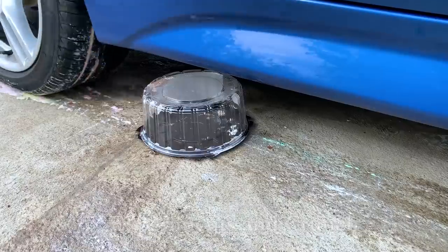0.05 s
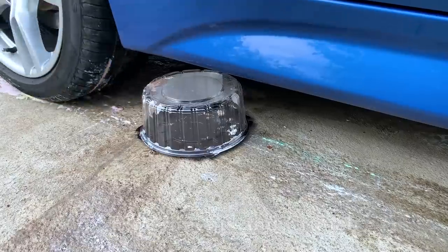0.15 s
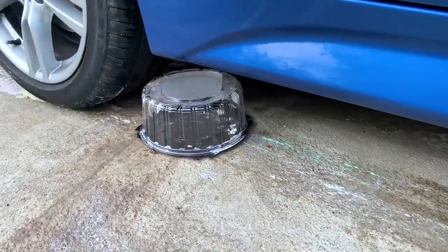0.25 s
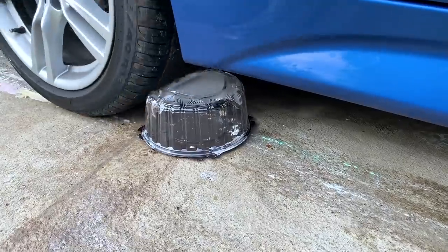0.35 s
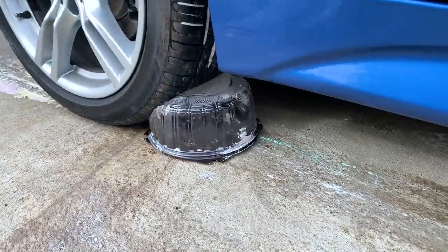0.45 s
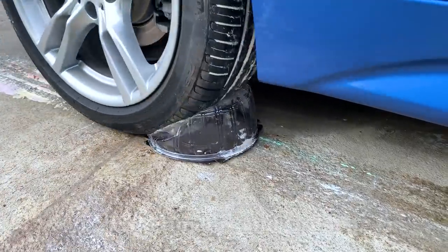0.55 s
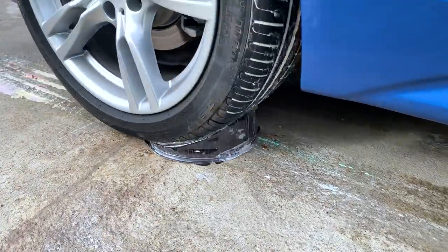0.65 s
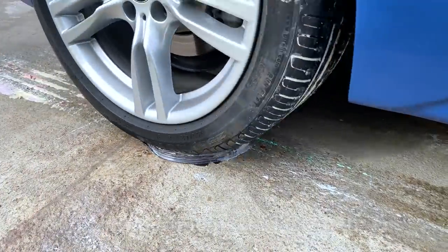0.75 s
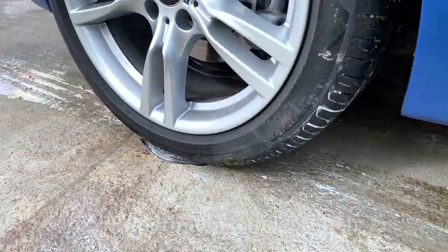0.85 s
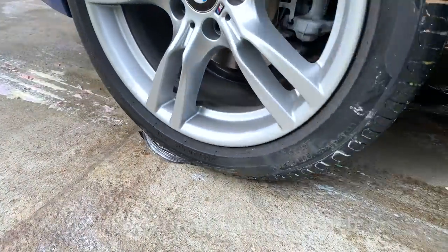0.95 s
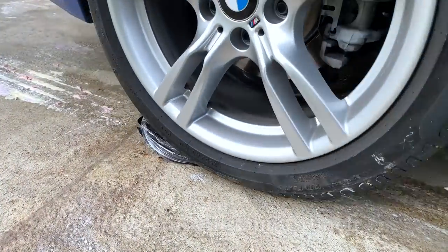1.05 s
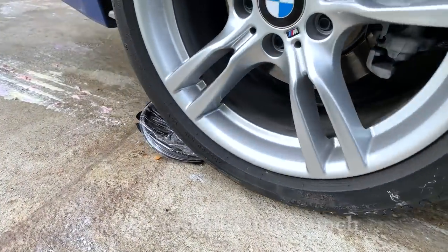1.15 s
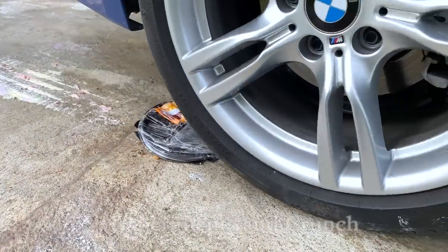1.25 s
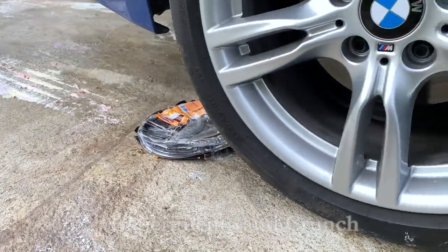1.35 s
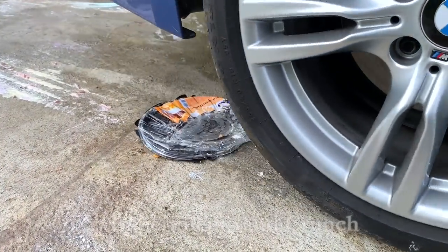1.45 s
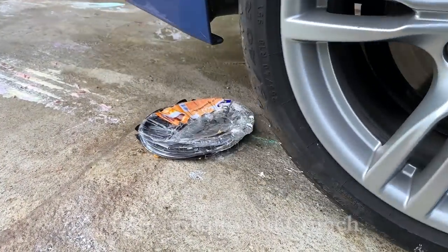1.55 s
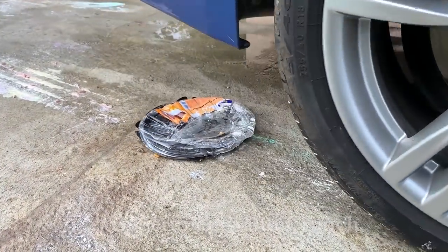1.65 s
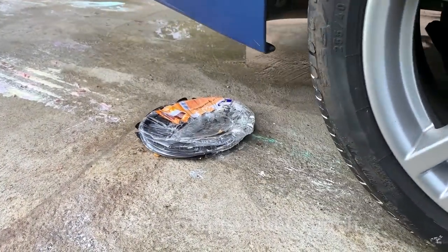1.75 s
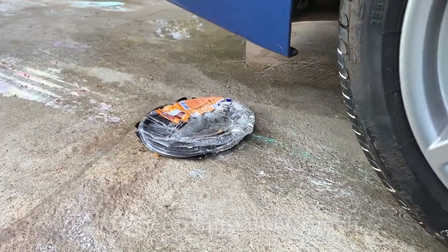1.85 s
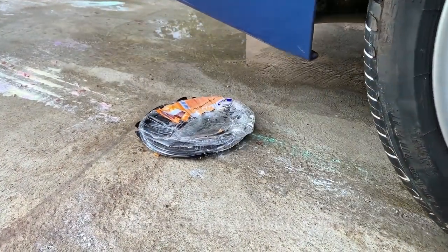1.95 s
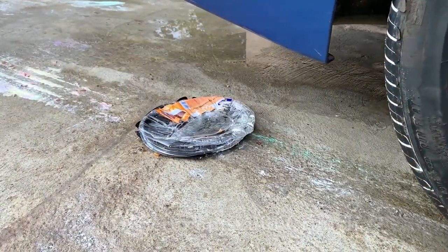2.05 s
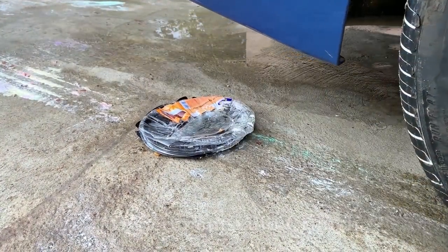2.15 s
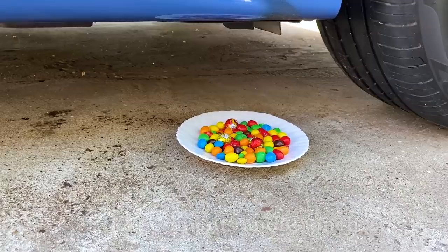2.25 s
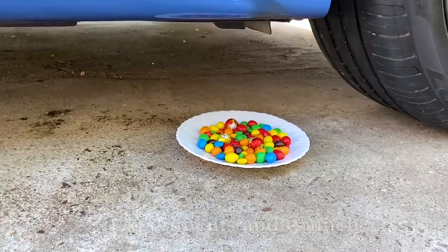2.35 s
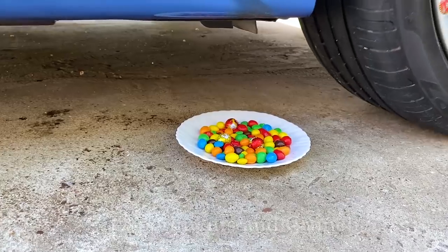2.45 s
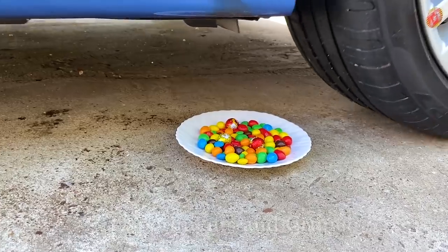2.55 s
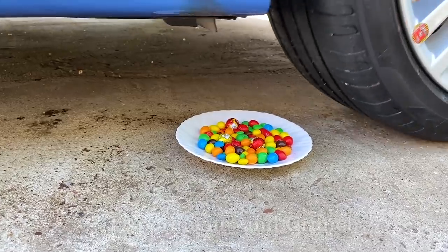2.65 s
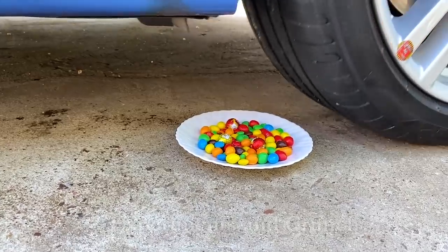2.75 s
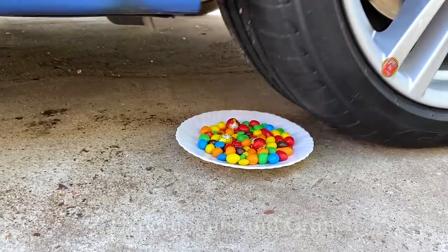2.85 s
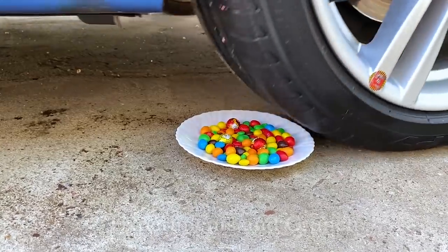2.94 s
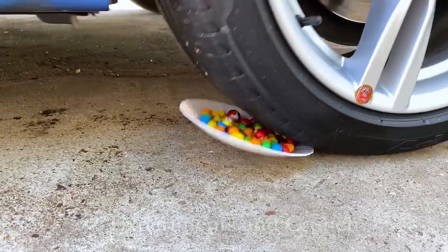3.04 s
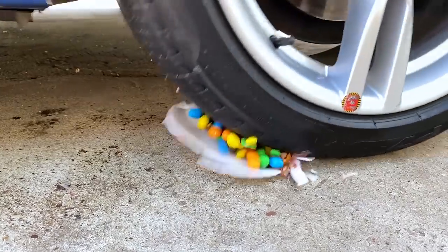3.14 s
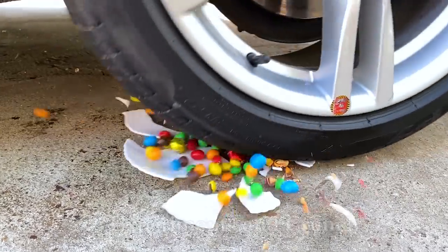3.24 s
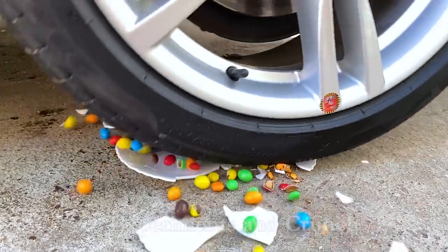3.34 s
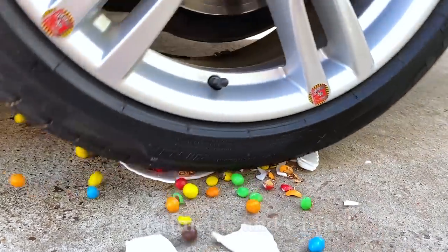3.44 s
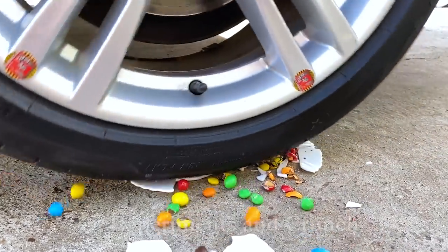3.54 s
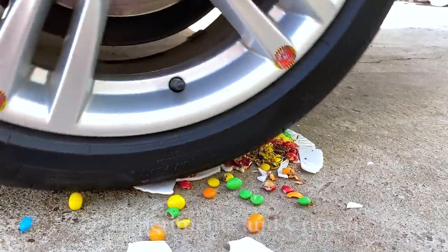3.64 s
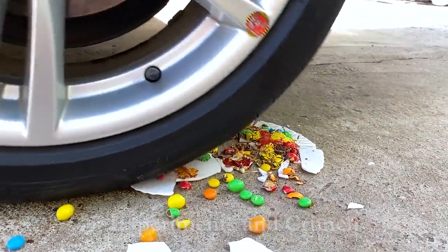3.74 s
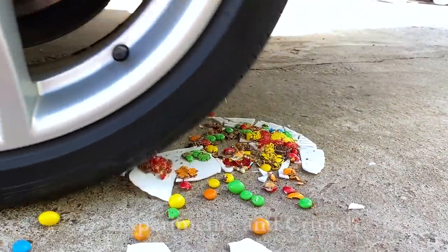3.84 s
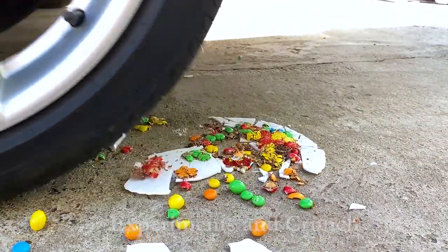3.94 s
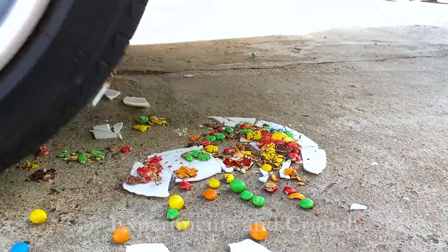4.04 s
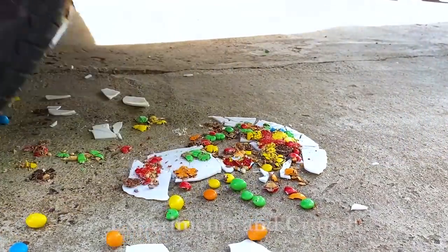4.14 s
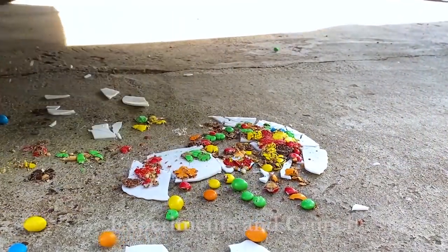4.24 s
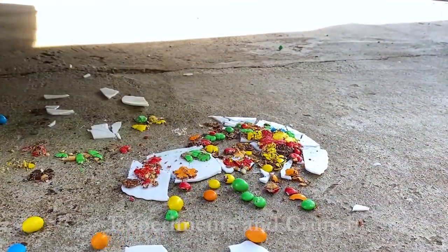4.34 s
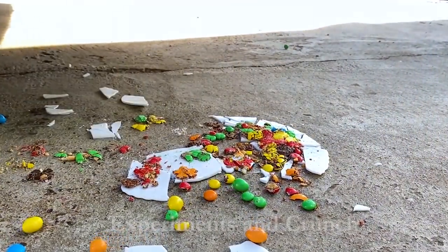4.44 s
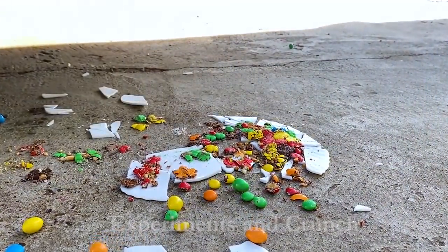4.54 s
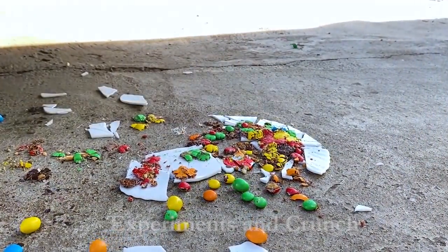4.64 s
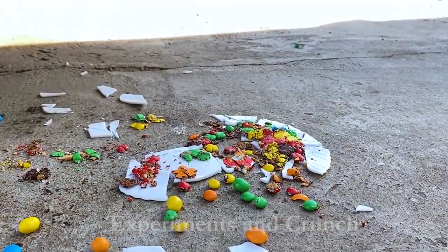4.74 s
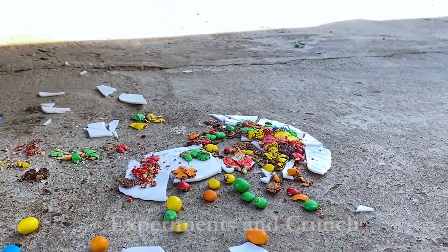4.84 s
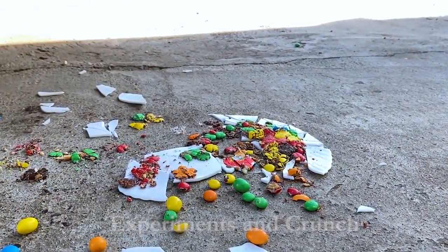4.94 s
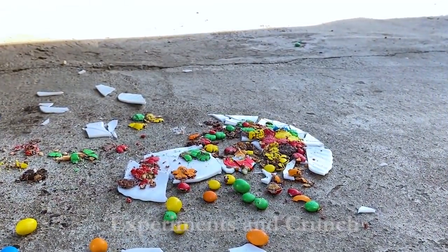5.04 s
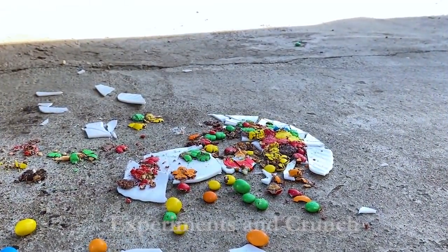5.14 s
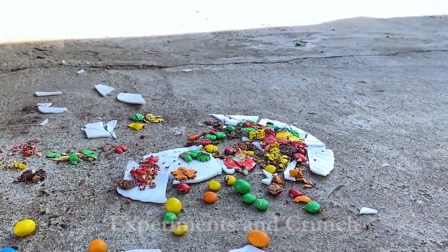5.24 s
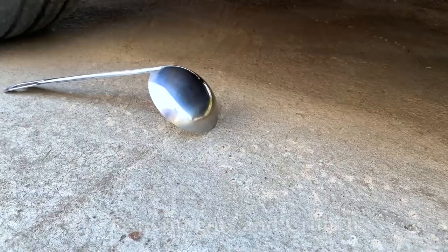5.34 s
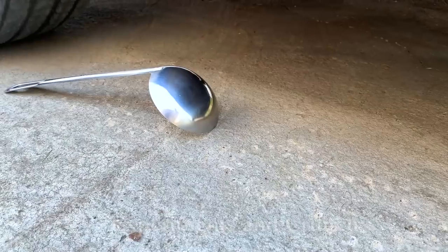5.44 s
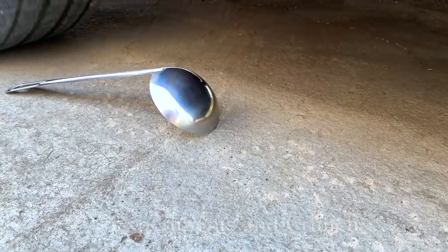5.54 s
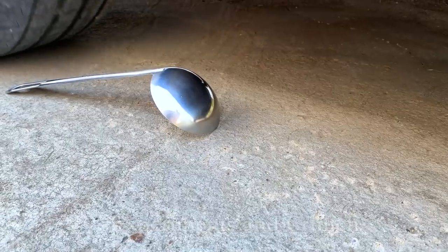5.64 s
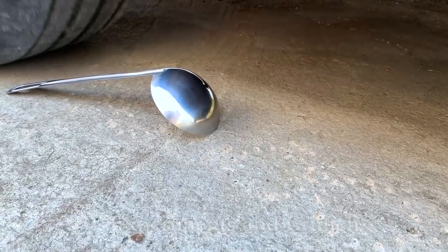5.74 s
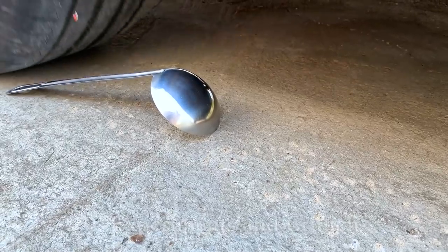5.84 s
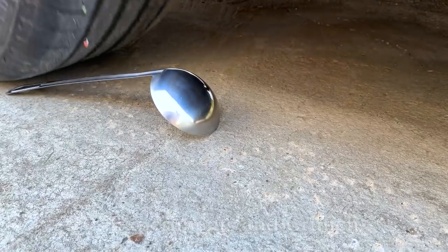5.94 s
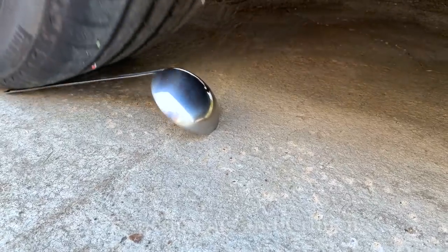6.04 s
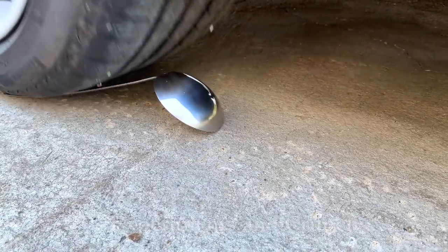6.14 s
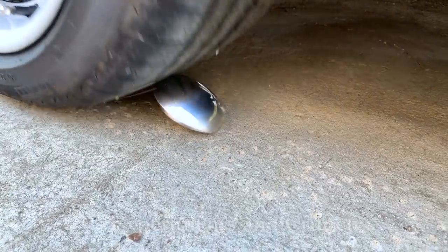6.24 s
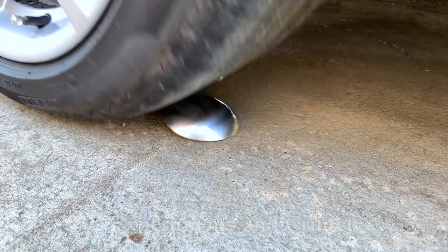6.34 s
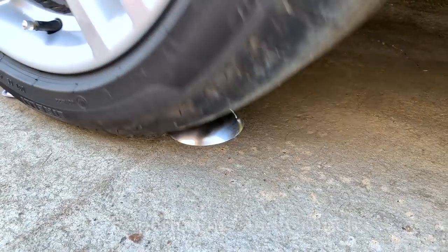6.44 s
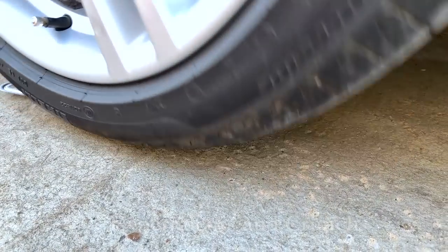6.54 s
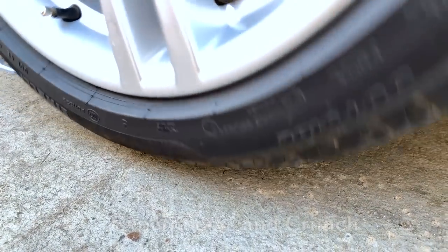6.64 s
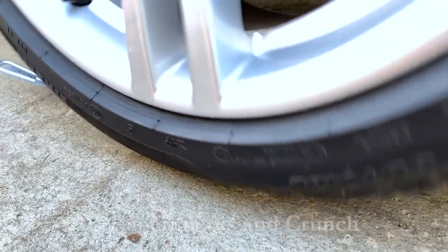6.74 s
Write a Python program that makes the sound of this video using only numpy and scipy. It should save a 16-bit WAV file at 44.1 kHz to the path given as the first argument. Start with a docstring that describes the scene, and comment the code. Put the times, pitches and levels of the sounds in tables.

```python
"""Concrete ground, beside the tyre of an idling car, all heard close by at one microphone in three scenes.
The engine is a sum of firing orders under throbbing filtered noise; its balance switches at each cut.
The car rolls slowly over a thin plastic cake box, which crumples and pops back: noise bursts and crackle
through resonances. A china plate of sweets shatters the same way, with falling-pitch thuds and ringing
shards; a steel ladle snaps over and grinds along the ground in stick-slip jerks."""
import sys
import numpy as np
from scipy import signal
from scipy.fft import rfft, irfft, next_fast_len
from scipy.io import wavfile
from scipy.ndimage import uniform_filter1d

SR = 44100
rng = np.random.default_rng(int(sys.argv[2]) if len(sys.argv) > 2 else 0)


def int16_out(signal):
    """Quantize to a 16-bit WAV file."""
    q = np.round(np.clip(np.atleast_2d(signal).T, -1, 1) * 32767)
    wavfile.write(sys.argv[1], SR, q.astype(np.int16))


N = 299439
TIME = np.arange(N) / SR


def from_db(db):
    """Decibels to gain."""
    return 10 ** (np.asarray(db) / 20)


def rms_one(x):
    """Scale to rms 1."""
    return x / np.sqrt(np.mean(x ** 2) + 1e-20)


def in_time(rows):
    """Each column of a curve at every sample."""
    s, *columns = np.transpose(rows)
    return [np.interp(TIME, s, c) for c in columns]


def add_at(out, s, sound):
    """Mix a sound into out, starting at s seconds."""
    at = round(s * SR)
    out[at:at + len(sound)] += sound


def butter(x, hz, kind, order=2):
    """Causal Butterworth filter."""
    sos = signal.butter(order, np.clip(hz, 10, .45 * SR), kind, fs=SR, output="sos")
    return signal.sosfilt(sos, x + 1e-18)


def drift(rate):
    """Smooth chance of spread 1, changing about rate times a second."""
    knots = rng.standard_normal(N // 10)
    return rms_one(np.interp(TIME * rate, np.arange(len(knots)), knots))


def colour(x, spectrum):
    """Causal (minimum-phase) filter with the given spectrum, falling away below its first point."""
    size = next_fast_len(N + 8192, True)
    hz, db = np.transpose(spectrum)
    f = np.maximum(np.arange(size // 2 + 1) * SR / size, 1)
    gain = from_db(np.interp(np.log(f), np.log(hz), db)) * np.minimum(f / hz[0], 1) ** 2
    # folding the cepstrum onto positive time gives the minimum phase
    cepstrum = irfft(np.log(gain), size)
    cepstrum[1:size // 2] *= 2
    cepstrum[size // 2 + 1:] = 0
    response = np.exp(rfft(cepstrum))
    return irfft(rfft(x, size) * response, size)[:N]


def resonate(x, modes):
    """Parallel two-pole resonances, each of gain 1 at its peak before its own dB."""
    out = 0
    for hz, width, db in modes:
        r = np.exp(-np.pi * width / SR)
        zeros = np.array([1, 0, -1]) * (1 - r * r) / 2
        poles = [1, -2 * r * np.cos(2 * np.pi * hz / SR), r * r]
        out = out + from_db(db) * signal.lfilter(zeros, poles, x + 1e-18)
    return out


def body(spectrum, modes, ring_db):
    """An object's answer to one click, in a low, a middle and a high register of energy 1 each."""
    click = signal.unit_impulse(N)
    answer = colour(click + from_db(ring_db) * resonate(click, modes), spectrum)[:4096]
    parts = [butter(answer, 800, "low", order=4),
             butter(answer, [800, 4000], "band", order=3),
             butter(answer, 4000, "high", order=4)]
    return [p / np.linalg.norm(p) for p in parts]


def pressure(press, fade_db_per_s, sag_db_per_s=0, swell_db=22):
    """Gain under one press of the tread: a swell, a slowly sagging hold and a steady fade."""
    start, full, easing, end = press
    swell = np.interp(TIME, [start, full], [-swell_db, 0])
    sag = sag_db_per_s * (np.clip(TIME, full, easing) - full)
    fade = fade_db_per_s * np.maximum(TIME - easing, 0)
    return from_db(swell - sag - fade) * (TIME > start) * (TIME < end)


def crunch(press, registers, per_s, size_db, clump_db, level_db, sag_db_per_s, fade_db_per_s,
           scatter_db=-29, scatter_s=0.014):
    """Countless tiny fractures in clumps of milliseconds, scattered under the car.

    Levels and slopes are for the low, middle and high register."""
    sizes = from_db(size_db * np.minimum(rng.exponential(1, N), 4)) * rng.choice([-1, 1], N)
    clumps = np.clip(drift(260), -2, 1.3)
    clicks = sizes * (rng.random(N) < per_s / SR) * from_db(clump_db * clumps)
    t = TIME[:SR // 16]
    scatter = rng.standard_normal(len(t)) * np.exp(-t / scatter_s)
    clicks = clicks + from_db(scatter_db) * signal.oaconvolve(clicks, scatter)[:N]
    out = 0
    for part, db, sag, fade in zip(registers, level_db, sag_db_per_s, fade_db_per_s):
        crackle = rms_one(signal.oaconvolve(clicks, part)[:N])
        out = out + crackle * from_db(db) * pressure(press, fade, sag)
    return out


def snaps(rows, bass, registers, decay_s, middle_gain_db, treble_gain_db, crack_db, tail_db, tail_s,
          facet_db, facet_q):
    """Each snap is a crack, a quick run of tearing with a decay per register, and a scatter from under the car."""
    out, t = np.zeros(N + SR), TIME[:SR // 8]
    for s, middle_db, high_db in rows:
        bass_db = middle_db + np.interp(s, *np.transpose(bass))
        levels = (bass_db, middle_db + middle_gain_db, high_db + treble_gain_db)
        # the facet that gives way rings at pitches of its own, about one an octave
        pitches = 400 * 2 ** (np.arange(5) + rng.random(5))
        facet = [(hz, hz / facet_q, facet_db) for hz in pitches]
        tearing = rng.standard_normal(len(t))
        tearing[0] = from_db(crack_db) * rng.choice([-1, 1])
        for part, db, decay in zip(registers, levels, decay_s):
            force = tearing * (np.exp(-t / decay) + from_db(tail_db) * np.exp(-t / tail_s))
            sound = signal.fftconvolve(force + resonate(force, facet), part)[:len(t)]
            # rms of the loudest moment
            strength = np.sqrt(uniform_filter1d(sound ** 2, size=64).max())
            add_at(out, s, from_db(db) * sound / strength)
    return out[:N]


# cuts between the three scenes: t/s
CUTS_S = (2.322, 5.402)
# engine pitch, one per scene: f/Hz of order 1
IDLE_HZ = (23.82, 23.63, 23.6)
# hum close to the car, one row per scene: level/dB of orders 1, 2, 3 ... before the scene's own level
HUM_BOX = [-40, -46.5, -42.5, -48.5, -42.5, -63.5, -62, -65, -59, -62.5, -70, -52.5, -67]
HUM_PLATE = [-56.5, -47, -42.5, -41.5, -45.5, -52.5, -54, -62.5, -59, -55.5, -73, -58.5, -70.5]
HUM_LADLE = [-34, -46, -40, -39.5, -40.5, -48.5, -45, -63, -62, -72.5, -84.5, -41.5, -52.5]
# spectrum of engine and fan rush, one per scene: f/Hz, relative level/dB per Hz
RUSH_BOX = [(40, 8), (120, 4.5), (300, -5.5), (600, -9.5), (1500, -9.5), (2600, -7.5), (4000, -14),
            (7000, -18.5), (11000, -23), (16000, -32)]
RUSH_PLATE = [(80, -3.5), (150, -5), (230, 2), (400, -11.5), (800, -14.5), (1300, -24), (1750, -14.5),
              (2600, -19.5), (4000, -26), (7000, -31.5), (10500, -37.5), (12000, -44), (13500, -43),
              (16000, -54)]
RUSH_LADLE = [(120, -27), (200, -1), (283, -7.5), (334, -9.5), (432, -5.5), (500, -14), (683, -19),
              (821, -17.5), (986, -14.5), (2510, -11.5), (4200, -21), (7270, -22.5), (16000, -38.5)]
# steady whirr of the engine bay beside the ladle: f/Hz, width/Hz, gain/dB
WHIRR = [(270, 21, -12), (441, 16, -3.5), (676, 89, 7.5), (1000, 4, 15)]
# engine in each scene: hum gain/dB, rush level/dB, fade of the rush as the car rolls on/dB per s
IDLE_LEVELS = [(-.5, -36, 5), (-2.5, -43, 1.1), (-.5, -35.5, 3)]
# hum and rush are heard to dip during the box crush and to sink after the plate breaks, while the
# engine itself idles on: t/s, hum change/dB, rush change/dB
IDLE_DIP = [(.35, 1.5, 1.5), (.6, -6, -3), (1.3, -2.5, 1.5), (2.1, 1, 4.5), (3.03, 4.5, 7), (3.3, -19, -2),
            (3.7, -10, 0.5), (3.9, -14.5, -17.5), (5.2, -9.5, -20)]
FLUTTER_DB = .6  # spread of the level's unsteadiness


def engine(throb=0.33):
    """Firing orders sum to a low hum; filtered noise rushes and throbs with the firing."""
    which, out = np.searchsorted(CUTS_S, TIME), np.zeros(N)
    # the dip belongs to the first two scenes only
    hum_dip, rush_dip = np.array(in_time(IDLE_DIP)) * (which < 2)
    wander = 0.0054 * drift(3.6)  # in turns
    unsteady = from_db(FLUTTER_DB * drift(25))
    balances = [(HUM_BOX, RUSH_BOX, []), (HUM_PLATE, RUSH_PLATE, []), (HUM_LADLE, RUSH_LADLE, WHIRR)]
    for k, (orders, spectrum, whirr) in enumerate(balances):
        now = which == k
        hum_db, rush_db, fade = IDLE_LEVELS[k]
        elapsed = TIME[now] - TIME[now][0]
        turn = 2 * np.pi * (IDLE_HZ[k] * TIME[now] + wander[now])
        lags = rng.uniform(-1.5, 1.5, len(orders))
        hum = sum(from_db(db) * np.cos((n + 1) * turn + lags[n]) for n, db in enumerate(orders))
        air = colour(rng.standard_normal(N), spectrum)
        rush = rms_one(air + resonate(air, whirr))[now]
        rush = rush * (1 + throb * np.cos(turn) * np.cos(2 * turn))
        hum_gain = from_db(hum_db + hum_dip[now])
        rush_gain = from_db(rush_db - fade * elapsed + rush_dip[now])
        out[now] = (hum * hum_gain + rush * rush_gain) * unsteady[now]
    return out


# loudest buckles, then creases popping back: t/s, middle level/dB, treble level/dB, before snap gains
BOX_SNAPS = [(0.348, -11, -12), (0.392, -6, -12), (0.418, -4.5, -14), (0.432, -10, -10.5),
             (0.493, -11, -15), (0.526, -5.5, -15.5), (0.55, -5, -16.5), (0.662, -6, -11.5),
             (0.695, -6, -14.5), (0.715, -9, -11.5), (0.743, -1.5, -21), (0.763, -11, -13),
             (0.794, -10.5, -14.5), (0.805, -3.5, -22), (0.826, -19, -15), (0.846, -9, -17.5),
             (0.854, -14, -17), (0.898, -13, -16), (0.929, -24, -17), (0.953, -22.5, -19),
             (0.984, -4.5, -14.5), (1.002, -13, -28.5), (1.024, -16.5, -17), (1.035, -32, -19),
             (1.086, -22, -17), (1.105, -9.5, -15), (1.131, -14, -33), (1.146, -11.5, -15),
             (1.179, -10.5, -15), (1.194, -7, -19), (1.231, -10, -14), (1.332, -28, -31.5), (1.4, -12, -23),
             (1.454, -22, -44), (1.52, -30, -19), (1.528, -7.5, -17.5), (1.625, -16, -48),
             (1.801, -23.5, -38), (2.032, -38, -31), (2.319, -26.5, -33)]
# spectrum of the plastic: f/Hz, relative level/dB per Hz
BOX_COLOUR = [(100, -9), (200, -10), (300, -2.5), (520, -4), (720, -5), (1000, -3.5), (1430, -1),
              (2400, -1.5), (3700, -8.5), (7350, -6.5), (12000, -10.5), (16000, -16)]
# resonances of the plastic: f/Hz, width/Hz, gain/dB before the ring level
BOX_MODES = [(350, 70, -2.5), (620, 86, 2), (1234, 52, -15), (1900, 160, -17.5), (2514, 620, 0.5),
             (3251, 180, -3), (7400, 1100, -18)]
# bass of a snap against its listed middle, before and after pressing flat: t/s, level/dB
BOX_BASS = [(0.619, -11.5), (.86, -29.5)]
# presses of the tread: start t/s, full t/s, easing t/s, end t/s
BOX_FOLDING = (.348, .362, .665, 1.0)
BOX_FLATTENED = (.72, .78, 1.237, 1.301)
FOLD_CLUMP_DB, CRINKLE_SIZE_DB = 5.0, 3.8
BOX_TAIL_DB, BOX_TREBLE_DECAY_S = -19, .0011


def cake_box():
    """Thin plastic folds in a dense crackle, crinkles on with less bass when flat, then pops back crease by crease."""
    wall = body(BOX_COLOUR, BOX_MODES, ring_db=-6.0)
    buckling = snaps(
        list(BOX_SNAPS) + creases(), BOX_BASS, wall, decay_s=(.0045, .003, BOX_TREBLE_DECAY_S),
        middle_gain_db=-6.5, treble_gain_db=5.0, crack_db=12.5, tail_db=BOX_TAIL_DB, tail_s=.009,
        facet_db=2.5, facet_q=14)
    folding = crunch(
        BOX_FOLDING, wall, per_s=2200, size_db=1.5, clump_db=FOLD_CLUMP_DB,
        level_db=(-20, -22, -22.5), sag_db_per_s=(25, 3, 0), fade_db_per_s=(75, 70, 80))
    crinkling = crunch(
        BOX_FLATTENED, wall, per_s=900, size_db=CRINKLE_SIZE_DB, clump_db=3.0,
        level_db=(-46, -36.5, -34), sag_db_per_s=(8, 3, 5), fade_db_per_s=(200, 170, 260))
    return buckling + folding + crinkling


# shortest and longest gap between small creases: t/s
CREASE_GAPS_S = (.008, .022)
# flat plastic still cracks, its small creases weakening no further than this: middle/dB, treble/dB
CREASE_FLAT_DB = (-8.5, -8.5)
# before the snap gains
CREASE_MIDDLE_DB, CREASE_TREBLE_DB, CREASE_SPREAD_DB = -11.5, -17, 2.8
CREASE_FADE_DB_PER_S = 70.5


def creases():
    """Rows of small random snaps (s, middle dB, treble dB), weaker as the plastic goes flat under the tyre."""
    s = BOX_FOLDING[1] + np.cumsum(rng.uniform(*CREASE_GAPS_S, 90))
    easing_s = np.maximum(s - BOX_FOLDING[2], 0)[:, None]
    flattening = np.maximum(-CREASE_FADE_DB_PER_S * easing_s, CREASE_FLAT_DB)
    chance = CREASE_SPREAD_DB * np.minimum(rng.standard_normal((len(s), 2)), 1)
    db = flattening + chance + [CREASE_MIDDLE_DB, CREASE_TREBLE_DB]
    return [(at, *levels) for at, levels in zip(s, db) if at < BOX_FLATTENED[2]]


# pieces giving way under the tread:
# t/s, level/dB before the tyre, first pitch f/Hz, period growth/s per s, decay/s
THUDS = [(0.463, -12, 546, 0.17, 0.015), (0.4852, -1.5, 425, 0.18, 0.002),
         (0.663, -18.5, 504, 0.67, 0.0076), (0.743, -16.5, 520, 0.26, 0.0057),
         (3.1736, -4.5, 740, 0.98, 0.0052), (3.231, -10, 1000, 0.17, 0.0014),
         (3.264, -5.5, 1220, 0.11, 0.0017), (3.2975, -21.5, 1310, 0.46, 0.0025),
         (3.3675, -10, 1410, 0.21, 0.003), (3.5472, -5.5, 760, 0.83, 0.0097), (3.608, -19, 650, 1, 0.0037)]


def thuds():
    """A loaded piece gives way with a knock whose pitch drops as it dies."""
    out = np.zeros(N + SR)
    t = TIME[:SR // 6]
    for s, db, hz, growth, decay in THUDS:
        cycles = np.log1p(growth * hz * t) / growth
        add_at(out, s, from_db(db) * np.sin(2 * np.pi * cycles) * np.exp(-t / decay))
    return out[:N]


# carcass, air cavity and tread of the tyre: f/Hz, width/Hz, gain/dB
TYRE_MODES = [(47, 5.2, 8.5), (216, 1.6, 3.5), (560, 310, -13.5)]


def tyre():
    """The thuds pass through the tyre, whose resonances boom and hum on after them."""
    knocks = thuds()
    return knocks + resonate(knocks, TYRE_MODES)


# squeaks of plastic and of steel under the rubber:
# t/s, length/s, pitch f/Hz, glide/Hz per s, level/dB, octave against it/dB
SQUEAKS = [(.634, .018, 3500, 21999.5, -20, 5), (6.65, 0.044, 4170, -2000, -44, -20)]


def squeaks():
    """A short stick-slip glide with its octave."""
    out = np.zeros(N)
    for s, length, hz, glide, db, octave_db in SQUEAKS:
        t = TIME[:round(length * SR)]
        turn = 2 * np.pi * (hz * t + glide * t ** 2 / 2)
        tone = np.sin(turn) + from_db(octave_db) * np.sin(2 * turn)
        add_at(out, s, from_db(db) * np.sin(np.pi * t / length) * tone)
    return out


# china cracking: t/s, middle level/dB, treble level/dB, before the snap gains
PLATE_SNAPS = [(3.029, -19.5, -31.5), (3.057, -14, -9), (3.072, -23, -6.5), (3.106, -7.5, -18),
               (3.13, -13.5, -29.5), (3.15, -9, -18), (3.171, -9.5, -13), (3.296, -21, -25),
               (3.546, -13, -19.5), (3.605, -18, -23.5)]
# spectrum of the cracking as heard at the microphone, with a narrow gap near 12 kHz:
# f/Hz, relative level/dB per Hz
PLATE_COLOUR = [(150, -17.5), (500, -3), (1200, -3.5), (2400, -0.5), (3500, -4), (4600, -2), (6200, 2.5),
                (8500, -3), (10500, 3.5), (12000, -17), (13500, -3.5), (16000, -21)]
# resonances of the china: f/Hz, width/Hz, gain/dB before the ring level
PLATE_MODES = [(1190, 150, -7), (1920, 80, -1), (3520, 110, 7), (5770, 170, 2), (6400, 120, -1),
               (8020, 270, -7), (10400, 140, -6)]
# bass of a snap against its listed middle: t/s, level/dB
PLATE_BASS = [(3.08, -27), (3.3, -11)]
# presses of the tread: start t/s, full t/s, easing t/s, end t/s
PLATE_BREAKING = (3.023, 3.082, 3.166, 3.24)
PLATE_GRINDING = (3.171, 3.19, 3.52, 4.3)


def plate():
    """Cracks set the china ringing; the pieces, too small to ring like the plate, are ground down with the sweets."""
    china = body(PLATE_COLOUR, PLATE_MODES, ring_db=9)
    pieces = body(PLATE_COLOUR, PLATE_MODES, ring_db=-17)
    whole = [row for row in PLATE_SNAPS if row[0] < PLATE_BREAKING[-1]]
    broken = [row for row in PLATE_SNAPS if row[0] >= PLATE_BREAKING[-1]]
    cracks = snaps(
        whole, PLATE_BASS, china, decay_s=(.003, .003, .0035), middle_gain_db=-7, treble_gain_db=-7.5,
        crack_db=-3.5, tail_db=-24, tail_s=0.013, facet_db=11.5, facet_q=78)
    splits = snaps(
        broken, PLATE_BASS, pieces, decay_s=(.003, .002, .002), middle_gain_db=-5, treble_gain_db=-0.5,
        crack_db=8, tail_db=-17.5, tail_s=0.0102, facet_db=4, facet_q=14.76)
    breaking = crunch(
        PLATE_BREAKING, china, per_s=3500, size_db=4.5, clump_db=5.5,
        level_db=(-41, -28, -23.5), sag_db_per_s=(-40, -55, 15), fade_db_per_s=(300, 600, 400))
    grinding = crunch(
        PLATE_GRINDING, pieces, per_s=1200, size_db=2.5, clump_db=19.5,
        level_db=(-46, -50, -45), sag_db_per_s=(8, 10, 3), fade_db_per_s=(40, 55, 55))
    return cracks + splits + breaking + grinding


# spectrum laid over the splinters, also with a gap near 12 kHz: f/Hz, relative level/dB per Hz
SPLINTER_COLOUR = [(2200, -0.5), (4300, 0), (6500, 3.5), (8800, -12), (10600, 6), (12000, -21), (13500, -3),
                   (16000, -15)]
# press of the tread: start t/s, full t/s, easing t/s, end t/s
SPLINTERS_JOSTLING = (3.07, 3.19, 3.38, 4.1)


def splinters(per_s=35, width_hz=35, level_db=-39.5, fade_db_per_s=52, count=56):
    """Many small splinters, each with its own pitch, jostle at random while the plate is ground."""
    out = 0
    for hz in np.linspace(2200, 14800, count) + rng.uniform(-110, 110, count):
        touches = (rng.random(N) < per_s / SR) * rng.standard_normal(N)
        out = out + resonate(touches, [(hz, width_hz, 0)])
    jostling = rms_one(colour(out, SPLINTER_COLOUR))
    return jostling * from_db(level_db) * pressure(SPLINTERS_JOSTLING, fade_db_per_s)


# loose shards landing: t/s, level/dB, lower mode f/Hz, upper mode f/Hz, t60/s
CLINKS = [(3.197, -27.5, 6140, 7600, 0.075), (3.207, -19.5, 5530, 10600, 0.038),
          (3.208, -31, 7100, 14400, 0.16), (3.276, -41, 4300, 7500, 0.29), (3.298, -29, 5740, 7270, 0.14),
          (3.341, -32, 6710, 7340, 0.12), (3.372, -38.5, 2350, 4326, 0.3),
          (3.385, -26.5, 2620, 6260, 0.024), (3.466, -29, 2900, 6840, 0.055),
          (3.487, -37.5, 6200, 10800, 0.3), (3.612, -41, 8170, 13600, 0.36),
          (3.697, -37, 5760, 10400, 0.064)]


def shards(upper_db=-4, rattle_db=-12, rattle_s=0.018):
    """Each shard rings in two modes and chatters briefly as it settles."""
    out, t = np.zeros(N + SR), TIME[:SR // 2]
    for s, db, low_hz, high_hz, t60 in CLINKS:
        touches = (rng.random(len(t)) < 200 / SR) * rng.standard_normal(len(t))
        touches = touches * from_db(rattle_db) * np.exp(-t / rattle_s)
        touches[0] = 1  # the landing itself
        modes = np.sin(2 * np.pi * low_hz * t) + from_db(upper_db) * np.sin(2 * np.pi * high_hz * t)
        ring = modes * np.exp(-np.log(1000) * t / t60)
        contact = 0.88 * rng.standard_normal(len(t)) * np.exp(-t / 0.00058)
        add_at(out, s, from_db(db) * signal.fftconvolve(touches, ring + contact)[:len(t)])
    return out[:N]


# one last shard drops off the tread and bounces: t/s, level/dB
BOUNCES = [(3.957, -44.5), (4.040, -39.5), (4.122, -48)]
# its modes: f/Hz, mean level/dB within a bounce, t60/s
SHARD_MODES = [(3556, -3.5, 0.15), (6050, -0.5, 0.057), (7830, -16, 0.17), (9120, -10.5, .08)]


def last_shard(contact_db=-9, contact_s=0.0018, uneven_db=3):
    """A shard bounces on the concrete, each time striking its modes a little differently."""
    out, t = np.zeros(N + SR), TIME[:SR // 2]
    for s, db in BOUNCES:
        ring = 0
        for hz, mode_db, t60 in SHARD_MODES:
            struck_db = mode_db + uneven_db * rng.standard_normal()
            ring = ring + from_db(struck_db - 60 * t / t60) * np.sin(2 * np.pi * hz * t)
        contact = from_db(contact_db) * rng.standard_normal(len(t)) * np.exp(-t / contact_s)
        add_at(out, s, from_db(db) * (ring + contact))
    return out[:N]


# steel slipping on concrete: t/s, middle level/dB, treble level/dB, before the snap gains
LADLE_SNAPS = [(6.079, -21, -24), (6.092, -10, -17), (6.096, -5, -17), (6.159, -2.5, -15),
               (6.245, -23.5, -15), (6.279, -5, -10), (6.283, -13, -14), (6.307, -9, -37), (6.336, -7, -19),
               (6.374, -14, -22), (6.401, -10.5, -22), (6.418, -19, -21), (6.546, -27, -23),
               (6.554, -24.5, -19), (6.581, -25.5, -29), (6.611, -34, -33)]
# spectrum of the steel: f/Hz, relative level/dB per Hz
LADLE_COLOUR = [(150, -10.5), (350, -4.5), (570, -11.5), (940, -2.5), (2140, 4), (3100, -1), (4200, -6.5),
                (8000, -8), (16000, -9)]
# resonances of the bowl: f/Hz, width/Hz, gain/dB before the ring level
LADLE_MODES = [(476, 31, -31), (950, 34, -6), (1670, 50, 3), (2080, 40, -11), (2650, 86, -22),
               (2900, 16, -15), (4500, 110, -31), (8300, 260, 2), (12100, 190, -5)]
# bass of a snap against its listed middle: t/s, level/dB
LADLE_BASS = [(6.28, -17), (6.39, -7)]
# press of the tread: start t/s, full t/s, easing t/s, end t/s
LADLE_SLIDING = (6.288, 6.326, 6.376, 6.75)
LADLE_FACET_DB = 0


def ladle():
    """The bowl slips in jerks and grinds over the grit, duller as it is pressed down, its ring damped by the rubber."""
    bowl = body(LADLE_COLOUR, LADLE_MODES, ring_db=-4.0)
    jerks = snaps(
        LADLE_SNAPS, LADLE_BASS, bowl, decay_s=(.006, .003, .002), middle_gain_db=-8.5,
        treble_gain_db=2.5, crack_db=4, tail_db=-25, tail_s=0.03, facet_db=LADLE_FACET_DB, facet_q=18)
    grit = crunch(
        LADLE_SLIDING, bowl, per_s=1800, size_db=3.5, clump_db=6.5,
        level_db=(-29, -25, -25), sag_db_per_s=(-60, 0, 110), fade_db_per_s=(160, 170, 70))
    return jerks + grit + rasp(bowl)


# press of the tread: start t/s, full t/s, easing t/s, end t/s
RASP_PRESS = (6.296, 6.304, 6.335, 6.52)
# the rasp sinks and fades as the tyre covers the bowl
RASP_HZ, RASP_SINK_OCTAVES_PER_S, RASP_DB, RASP_FADE_DB_PER_S = 2580, 15.8, -15.5, 122
SLIP_EVERY_S, SLIP_DECAY_S = .0075, 0.002  # mean gap between slips, decay of each


def rasp(bowl, spread=0.29, uneven_db=2, count=11):
    """The bowl sticks and slips on the grit in quick uneven jerks; the loudest part of its ring slides down."""
    sinking_s = np.maximum(TIME - RASP_PRESS[2], 0)
    centre_hz = RASP_HZ * 2 ** (-RASP_SINK_OCTAVES_PER_S * sinking_s)
    times = np.cumsum(SLIP_EVERY_S * rng.uniform(.7, 1.3, 1200))
    strengths = from_db(uneven_db * rng.standard_normal(len(times)))
    slips = np.bincount((times * SR).astype(int), strengths, N)[:N]
    sliding = signal.lfilter([1], [1, -np.exp(-1 / (SLIP_DECAY_S * SR))], slips + 1e-18)
    scrape = signal.oaconvolve(rng.standard_normal(N) * sliding, sum(bowl))[:N]
    out = 0
    # bands of equal strength, each opened as the sinking centre passes it
    for hz in np.geomspace(600, 4800, count):
        band = rms_one(butter(scrape, [hz / 1.11, hz * 1.11], "band", order=1))
        out = out + band * np.exp(-(np.log(hz / centre_hz) / spread) ** 2)
    return out / 2 * from_db(RASP_DB) * pressure(RASP_PRESS, RASP_FADE_DB_PER_S)


def scene():
    """The idling car and the three things under its tyre, on one channel."""
    car_and_box = engine() + cake_box() + tyre() + squeaks()
    china = plate() + splinters() + shards() + last_shard()
    return (car_and_box + china + ladle())[None]


CUTOFF_HZ = 16000


def record(dry):
    """The microphone's signal: the loudest peaks are rounded, the top is cut."""
    rounded = .75 * np.tanh(dry / .75)
    return signal.sosfilt(signal.ellip(10, .1, 80, CUTOFF_HZ, fs=SR, output="sos"), rounded)


dry = scene()
out = record(dry)
int16_out(out)
```